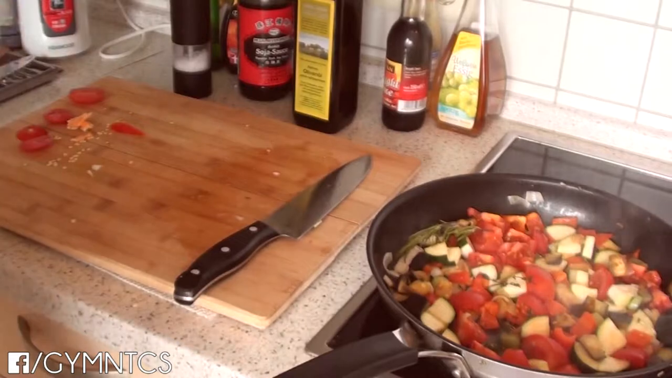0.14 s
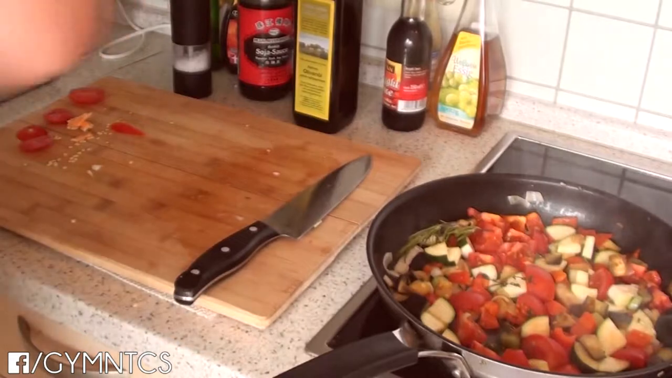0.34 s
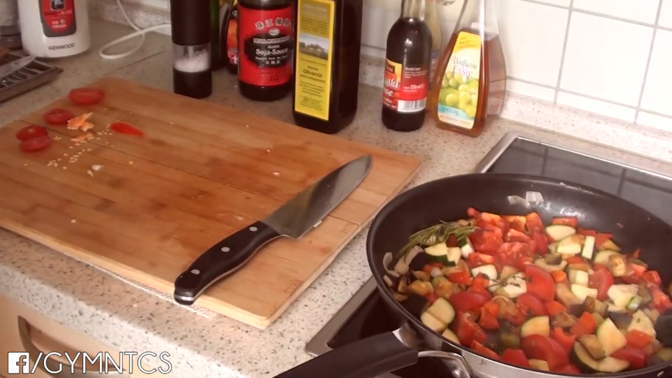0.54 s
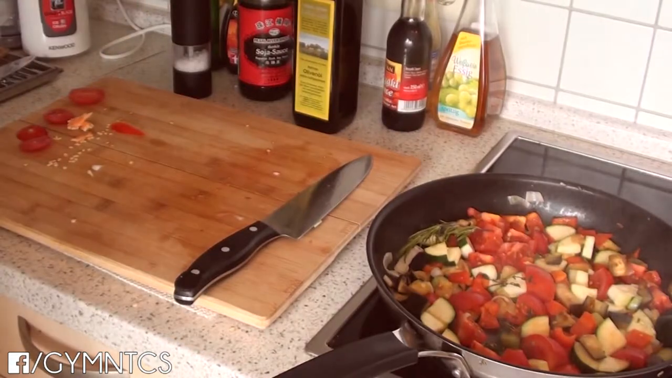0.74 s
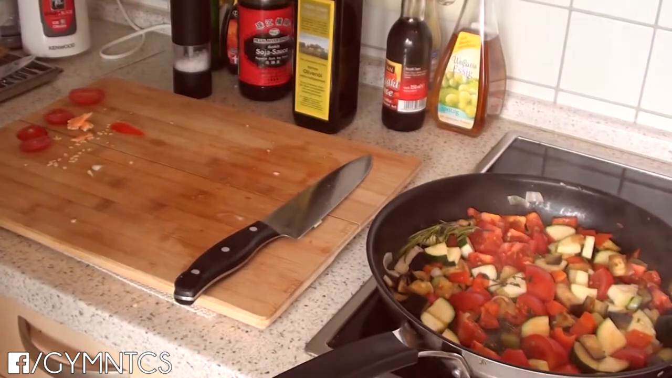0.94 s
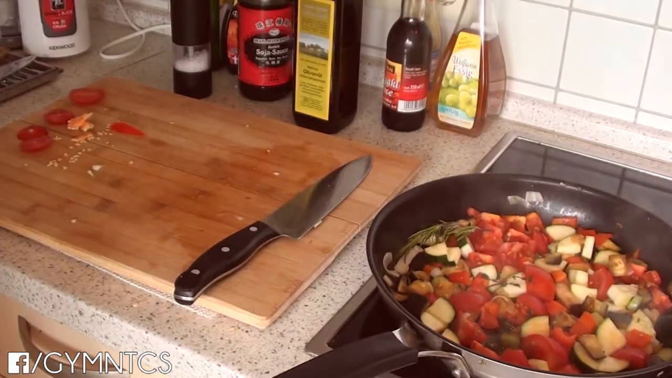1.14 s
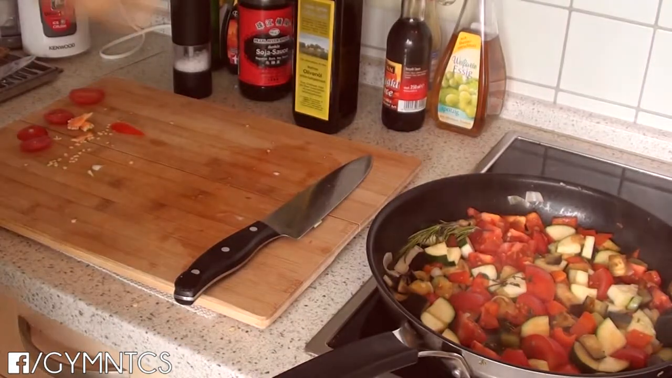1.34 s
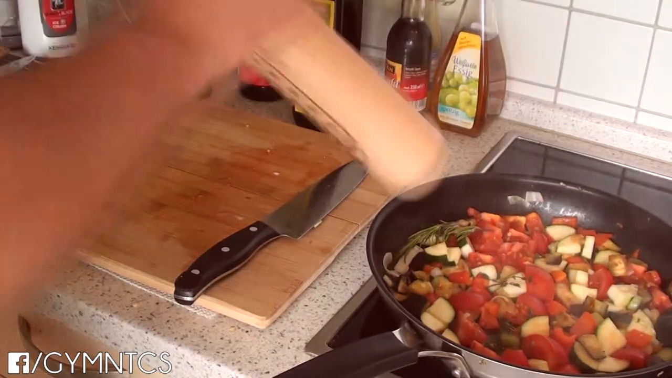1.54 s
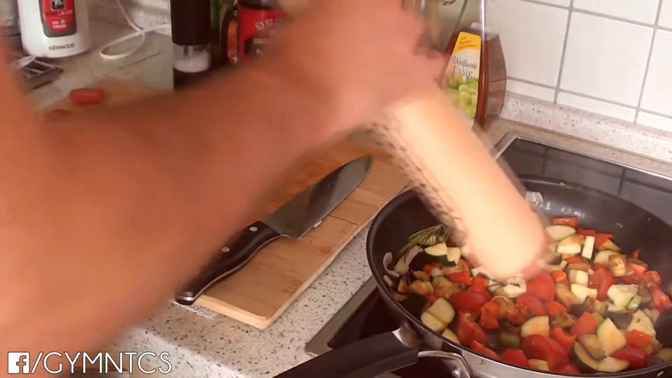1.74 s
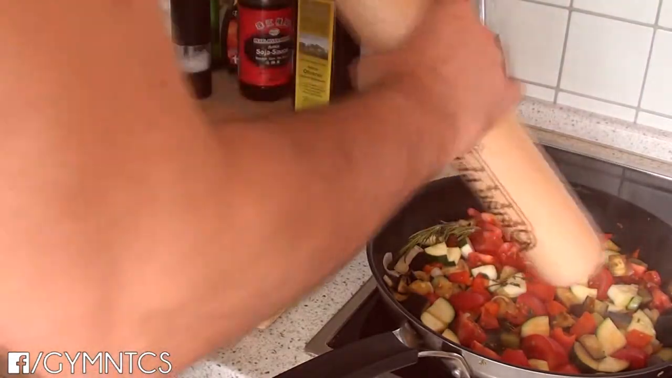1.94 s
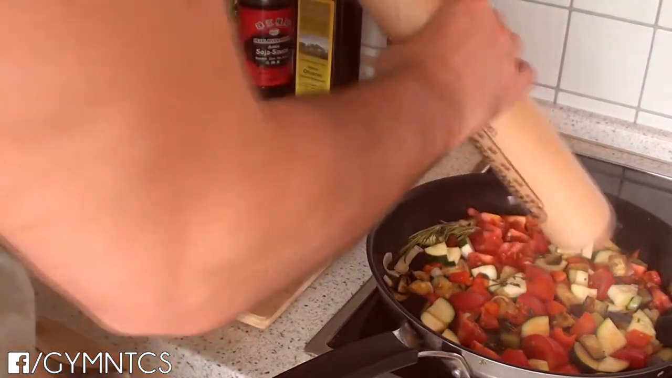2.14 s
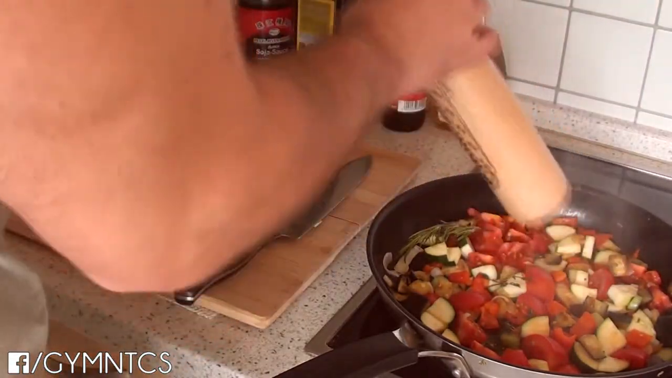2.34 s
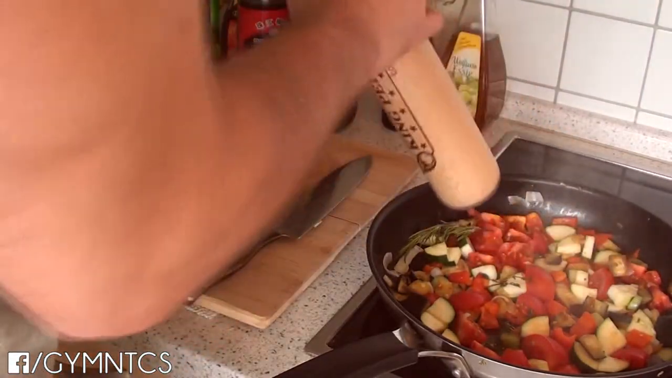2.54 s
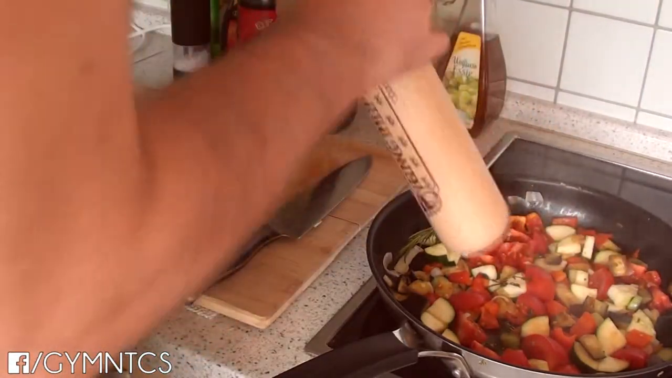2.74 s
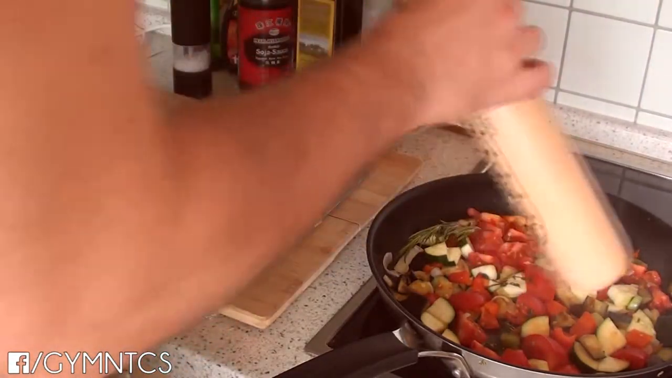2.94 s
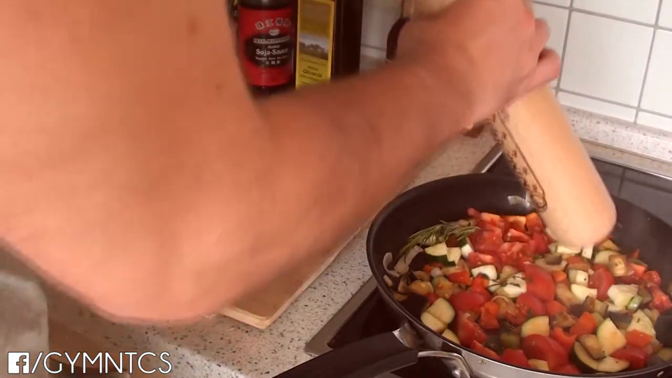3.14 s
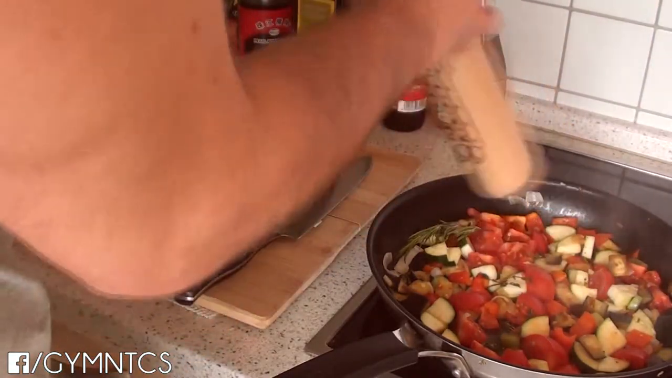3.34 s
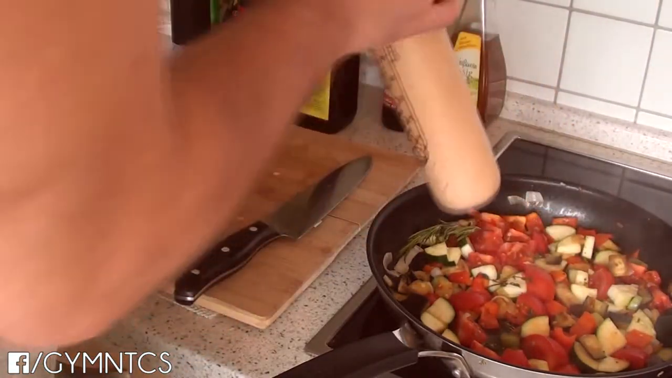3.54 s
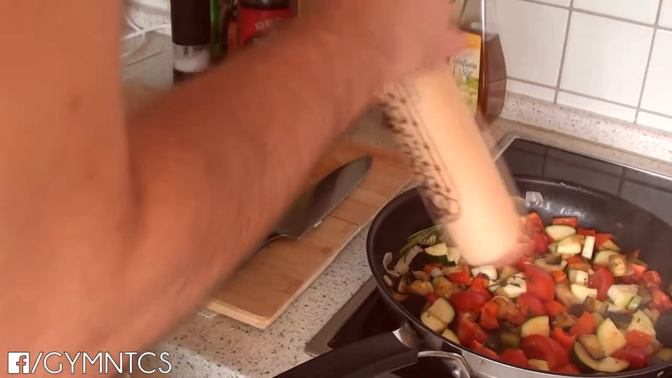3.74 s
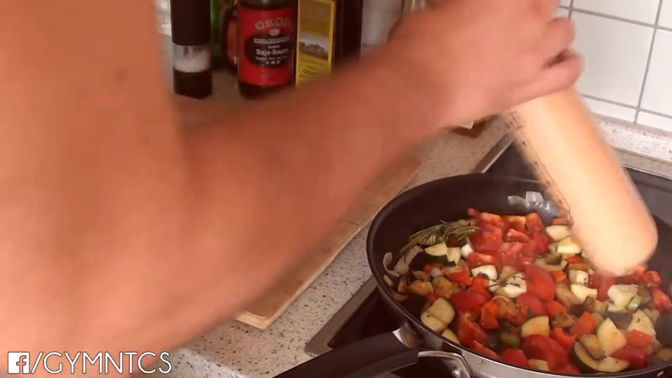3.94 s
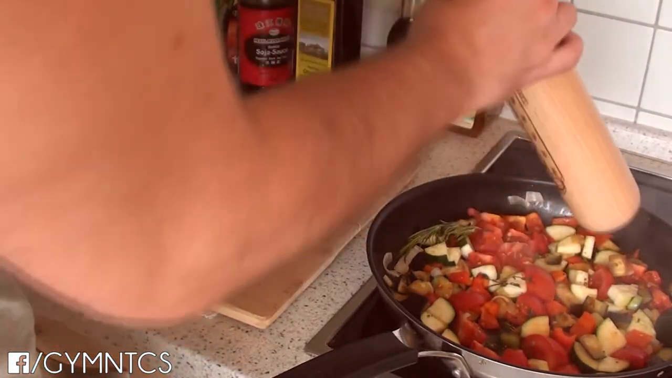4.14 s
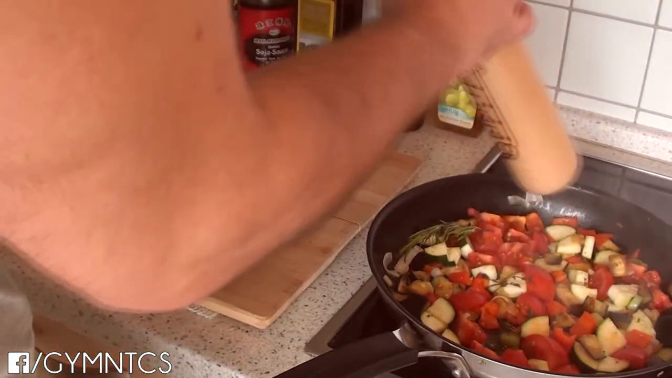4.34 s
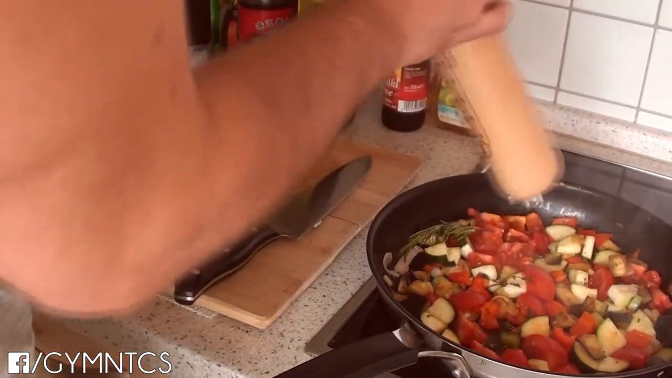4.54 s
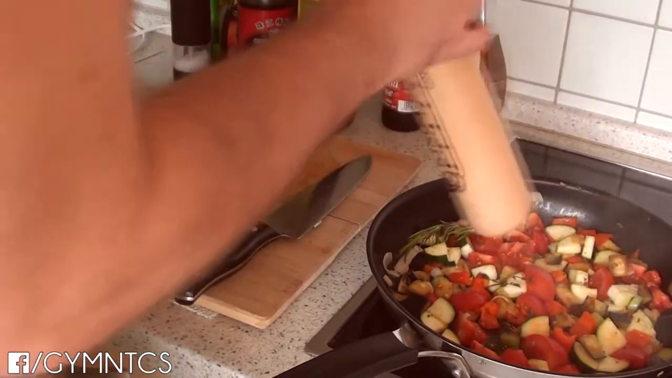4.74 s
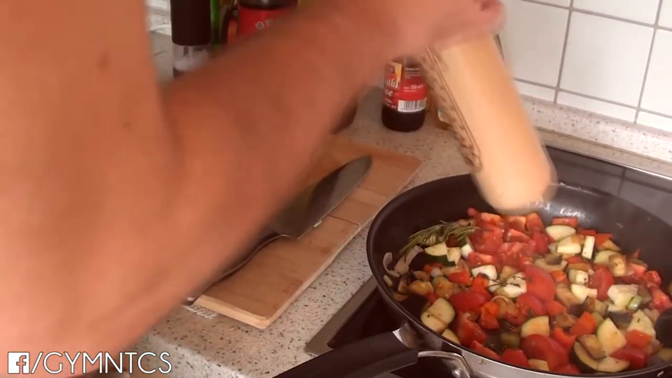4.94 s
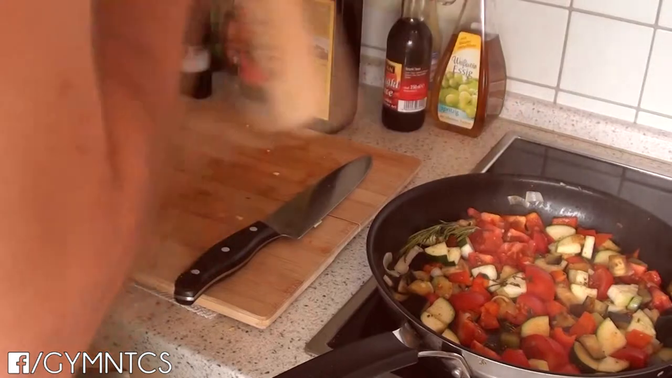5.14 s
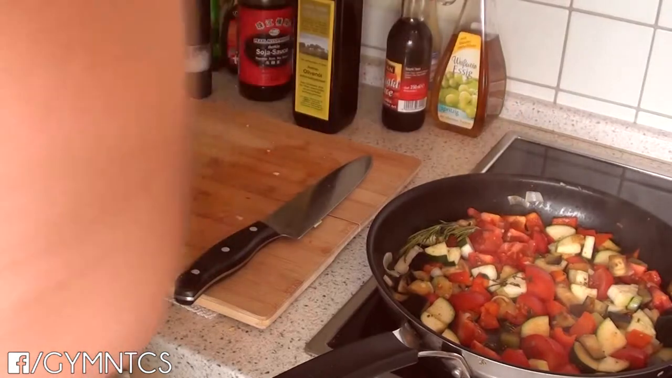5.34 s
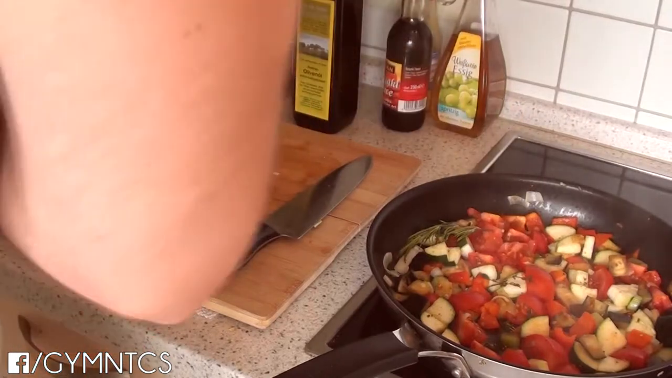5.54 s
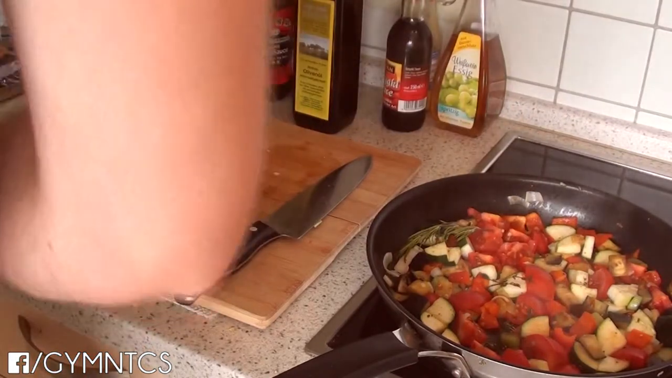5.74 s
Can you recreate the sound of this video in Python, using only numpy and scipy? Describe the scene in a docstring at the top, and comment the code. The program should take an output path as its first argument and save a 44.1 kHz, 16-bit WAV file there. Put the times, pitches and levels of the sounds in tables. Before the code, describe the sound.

Vegetables sizzle softly in a pan; a dull wooden knock, then a pepper mill crunches in quick, crackling twists in a tiled kitchen.

```python
"""Light rustles and a dull wooden knock come first, over the soft sizzle of vegetables in a pan.
Then a wooden pepper mill is twisted in quick strokes. Each twist is a dense crunch of random grains
with a few sharp cracks, which ring the wooden body and the steel burr as fading tones.
Random clicks make the sizzle and a fine ticking, likely falling pepper, that rises as the mill is lifted.
A fading noise tail is the echo of the tiled kitchen, and a fast compressor holds the loudest peaks."""
import sys
import numpy as np
from scipy import signal
from scipy.fft import rfft, irfft
from scipy.io import wavfile
from scipy.ndimage import uniform_filter1d, minimum_filter1d

SR = 44100
rng = np.random.default_rng(int(sys.argv[2]) if len(sys.argv) > 2 else 0)


def unload_audio(sound):
    """Save the sound as a 16-bit wav file, at the path given as the first command line argument."""
    columns = np.transpose(np.atleast_2d(sound))
    # keep every value between -1 and 1, then stretch to whole-number steps
    steps = np.round(np.clip(columns, -1, 1) * 32767)
    wavfile.write(sys.argv[1], SR, steps.astype(np.int16))


N = 254837
T = np.arange(N) / SR  # time in seconds

# All levels in the tables are relative: they are mixed further on.
# Twists of the mill, about three a second.
# Each row: start in seconds, length in seconds, force on the wooden body in dB, bright grit in dB.
TWISTS = [(1.602, 0.066, -21, -24.5), (1.904, .048, -14, -18), (2.028, 0.063, -40, -23.5),
          (2.174, 0.069, -21.5, -21.5), (2.482, 0.057, -22.5, -22.5), (2.772, 0.096, -24, -19.5),
          (3.074, 0.071, -20, -18), (3.385, 0.095, -28.5, -22.5), (3.705, .07, -19, -18.5),
          (4.025, 0.051, -23.5, -26.5), (4.328, 0.11, -18, -19), (4.633, .082, -17, -17),
          (4.935, 0.016, -26.5, -24)]
# Tones of the mill's wooden body.
# Each row: pitch in Hz before random detuning, level in dB, time to fade by 60 dB in seconds.
BODY = [(905, 3, 0.11), (1285, -40.5, 0.18), (1436, -41, 0.016), (1578, 4.5, 0.2), (1695, 9.5, 0.011),
        (1792, 13, 0.042), (2477, -18.5, 0.034)]
# Tones of the steel burr and shaft, with the same columns; only the cracks detune them.
BURR = [(2850, -8.5, 0.11), (3210, -12, 0.035), (3085, 4, 0.046), (4420, -4.5, 0.12)]


def undb(db):
    """Turn decibels into a gain."""
    return 10 ** (np.asarray(db) / 20)


def unit(x):
    """Scale to an energy of one."""
    return x / np.sqrt(np.sum(x ** 2) + 1e-18)


def add(track, s, sound):
    """Mix a sound into a track at time s in seconds."""
    i = max(int(s * SR), 0)
    track[i:i + len(sound)] += sound[:max(N - i, 0)]


def through(x, response):
    """Pass a sound through an impulse response."""
    return signal.fftconvolve(x, response)[:N]


def high_pass(x, hz, order):
    """Weaken what lies below hz."""
    return signal.sosfilt(signal.butter(order, hz, "high", fs=SR, output="sos"), x)


def on_log_axis(hz, points_hz, values):
    """Join points by straight lines over log frequency."""
    return np.interp(np.log(hz + 1), np.log(points_hz), values)


def colour(points, size=4096):
    """Make a filter of unit energy that follows an outline of (Hz, dB) and never sounds early."""
    db = on_log_axis(np.fft.rfftfreq(size, 1 / SR), *np.transpose(points))
    # folding the cepstrum gives the outline its minimum-phase response
    cepstrum = irfft(np.log(undb(db)))[:size // 2]
    cepstrum[1:] *= 2
    return unit(irfft(np.exp(rfft(cepstrum, size)))[:size // 2])


def resonance(hz, width):
    """Make a unit-energy response with one broad peak; width is a share of its centre."""
    b, a = signal.iirpeak(min(hz, SR / 3), 1 / width, fs=SR)
    impulse = T[:SR // 20] == 0
    return unit(signal.lfilter(b, a, impulse))


def ring(modes):
    """Sum the fading tones of a struck object into a response of unit energy."""
    t = T[:SR // 4]
    total = 0
    for k, (hz, db, t60) in enumerate(modes):
        tone = np.sin(2 * np.pi * hz * t) * np.exp(-np.log(1000) * t / t60)
        total = total + undb(db) * unit(tone) * (-1) ** k  # every other tone is flipped
    return unit(total)


def detuned(modes, share):
    """Nudge each tone in pitch, as the grip and the point of contact do."""
    return [(hz * (1 + share * rng.standard_normal()), db, t60) for hz, db, t60 in modes]


def grains(count, per_s, spread_db):
    """Scatter random clicks of very uneven size over count samples, with an rms of one."""
    chance = rng.random((count, 2))
    size = undb(spread_db * np.minimum(rng.exponential(size=count), 4))
    happens = chance[:, 0] < per_s / SR
    sign = np.sign(chance[:, 1] - .5)
    return unit(happens * sign * size) * np.sqrt(count)


def burst(decay_s, size=4096, count=6):
    """Make a brief rattle of contacts, of unit energy and fairly even in spectrum, that dies away."""
    fade = np.exp(-T[:size] / max(decay_s, 1 / SR))
    x = rng.standard_normal(size) * fade
    for _ in range(count):
        flat = irfft(np.exp(1j * np.angle(rfft(x))))
        x = flat * np.sqrt(fade)
    return unit(x)


def walk(per_s):
    """Wander slowly and randomly with a spread near one."""
    k = int(SR / per_s)
    steps = np.repeat(rng.standard_normal(N // k + 1), k)
    return uniform_filter1d(steps, k)[:N]


def room_tone():
    """Faint coloured noise is the air of the room, and a steady sine is the mains hum."""
    # Each row: frequency in Hz, level in dB.
    air = [(40, -19.5), (100, -23), (200, -14), (450, 1), (750, 1.5), (1300, -1.5), (1900, 1), (3000, -6),
           (6000, -23)]
    hum = undb(-74.5) * np.sqrt(2) * np.sin(2 * np.pi * 50 * T)
    return undb(-59.5) * through(rng.standard_normal(N), colour(air)) + hum


def kitchen(x, gap_s=0.001, build_s=0.0079):
    """Reflections off tiles and cupboards build up quickly and fade at a rate set for each band."""
    # Each row: band centre in Hz, time to fade by 60 dB in seconds, level in dB.
    echo_bands = [(150, 0.61, -6), (398, 0.31, 2), (900, 0.58, -4), (1660, 0.45, -2.5), (3500, 0.42, 1.5),
                  (7300, 0.54, -8), (14500, 0.35, -4)]
    size = 32768
    t = np.maximum(T[:size] - gap_s, 0)
    hz = np.fft.rfftfreq(size, 1 / SR)
    noise = rfft(rng.standard_normal(size))
    centres = [row[0] for row in echo_bands]
    tail = 0
    # each share picks one band, blending into its neighbours
    for share, (_, t60, db) in zip(np.eye(len(echo_bands)), echo_bands):
        fade = unit((1 - np.exp(-t / build_s)) * np.exp(-np.log(1000) * t / t60))
        tail = tail + undb(db) * fade * irfft(noise * on_log_axis(hz, centres, share))
    return through(x, tail)


def pan_and_ticking(flicker_db=-2.76):
    """Steam bubbles burst in the oil as a narrow hiss; fine clicks, likely falling pepper, tick above."""
    # Colour of the hiss. Each row: frequency in Hz, level in dB.
    hiss_colour = [(2500, -29), (4000, -23), (5200, -20), (5900, -9), (6500, 0), (7150, 4.5), (8400, -1),
                   (9500, -9), (11000, -13.5), (12500, -20), (14000, -26), (16000, -33.5)]
    # Colour of the ticking. Each row: frequency in Hz, level in dB.
    ticking_colour = [(400, -32.5), (3000, -31.5), (5500, -8.5), (7000, 6), (9000, -3.5), (12000, -6.5),
                      (16000, -20)]
    # Level of the fine ticking, likely pepper falling, that rises as the mill is lifted.
    # Each row: time in seconds, level in dB.
    ticking_levels = [(0, -60.5), (1.15, -62.5), (1.48, -35.5), (2.4, -42.5), (4.3, -44.5), (5.2, -46),
                      (5.55, -65)]
    # The loudest single ticks: pepper shifting as the mill is lifted, and spitting fat.
    # Each row: time in seconds, level in dB.
    loud_ticks = [(1.3733, -9.5), (1.474, 2), (3.2208, 0.5), (3.2554, -4), (5.1931, -8)]
    bubbles = grains(N, 7000, spread_db=3) * undb(-37 + flicker_db * walk(per_s=20))
    lone_ticks = grains(N, 70, spread_db=3.5) * undb(-47)
    sparse = grains(N, 8, spread_db=3.5) * undb(-7)
    dense = grains(N, 900, spread_db=4.5)
    ticking = (dense + sparse) * undb(np.interp(T, *np.transpose(ticking_levels)))
    for s, db in loud_ticks:
        add(ticking, s, undb(db) * burst(decay_s=0.00067))
    hiss = through(bubbles + lone_ticks, colour(hiss_colour))
    return hiss + through(ticking + undb(-32.5) * lone_ticks, colour(ticking_colour))


def rubs_and_flare():
    """Grainy clicks in bands of pitch: soft rubs of things moved, and one brief flare of the sizzle."""
    # Light rustles and scrapes; the row at 7300 Hz is the flare. Each row: start in seconds,
    # length in seconds, level in dB, centre in Hz, width as a share of the centre.
    soft_sounds = [(0.283, 0.054, -42, 5600, 0.16), (0.279, .045, -54, 2930, .06),
                   (0.36, 0.057, -41.5, 420, 0.62), (0.431, .14, -52, 430, 0.89),
                   (0.573, .05, -42.5, 500, 0.49), (.574, 0.022, -29, 7300, 0.093),
                   (.57, 0.046, -48.5, 1940, 0.075), (1.373, 0.1, -49.5, 4650, 0.46),
                   (1.375, 0.026, -55, 651, 0.69)]
    out, t = np.zeros(N), T[:SR // 2]
    for s, length, db, hz, width in soft_sounds:
        swell = (1 - np.exp(-t / 0.0048)) * np.exp(-np.maximum(t - length, 0) / .033)
        band = unit(through(resonance(hz, width), resonance(hz, 2 * width)))
        clicks = grains(len(t), 6000, spread_db=2.5) * swell
        add(out, s, undb(db) * through(clicks, band))
    return out


def knocks():
    """Blunt blows on the worktop give a thud and make its low tones ring."""
    # Something wooden is set down and rocks before it settles.
    # Each row: time in seconds, level in dB, contact length in seconds.
    blow_list = [(0.6379, -1.5, 0.031), (0.645, 1.5, 0.015), (0.662, -4.5, 0.012), (0.681, -1.5, 0.018)]
    # Colour of the thud. Each row: frequency in Hz, level in dB.
    thud_colour = [(40, -34), (100, -26.5), (165, -20), (220, 1.5), (300, -15), (430, 3.5), (530, -5.5),
                   (700, -2), (930, -17), (1130, -10), (1450, -21.5), (1900, -18), (3200, -31),
                   (4500, -36.5), (8000, -69)]
    # Tones of the worktop. Each row: pitch in Hz, level in dB, time to fade by 60 dB in seconds.
    worktop = [(217, -8, .16), (261, -15.5, 0.32), (419, 5.5, 0.12), (425, -1, 0.3), (533, -5.5, 0.19),
               (577, -6, 0.086), (640, -17.5, 0.07), (650, -14, 0.21), (735, -18, .12), (1090, -19.5, 0.16),
               (1135, -24, .2), (1826, -12.5, 0.22)]
    blows = np.zeros(N)
    for s, db, contact_s in blow_list:
        add(blows, s, undb(db) * burst(contact_s))
    thud = undb(19) * through(blows, colour(thud_colour))
    ringing = undb(12.5) * through(blows, ring(worktop))
    return high_pass(thud + ringing, hz=90, order=2)


def damping(spread_db):
    """Hand and contact point damp the mill differently each time: random peaks and dips."""
    return colour([(hz, spread_db * rng.standard_normal()) for hz in np.geomspace(700, 9000, num=22)])


def chips(count=2):
    """A tick starts each twist as the burr catches, then small corns split at random moments."""
    catch_body_db, catch_snap_db = 14, 16.5  # the tick, above the twist's force and grit
    chip_body_db, chip_snap_db, scatter_db = 18.5, 16, 3  # small cracks, above force and grit
    rows = []  # each row: time in seconds, blow in dB, snap in dB
    for s, length, force_db, grit_db in TWISTS:
        rows.append((s, force_db + catch_body_db, grit_db + catch_snap_db))
        for moment in rng.uniform(.25, 1, count):
            blow_db, snap_db = scatter_db * rng.standard_normal(2)
            rows.append((s + length * moment, force_db + chip_body_db + blow_db,
                         grit_db + chip_snap_db + snap_db))
    return rows


def crushing(wood_detune, grains_per_s=2600, spread_db=2.0, catch_db=3.0):
    """The burr crushes corns in jerks: grains push the body, ring wood and steel, and add grit."""
    rise_s, swell_s, release_s = 0.0037, 0.012, 0.042
    grumble_db, grumble_follow = -18.5, 0.41  # level at a force of 0 dB; dB gained per dB of force
    body, rings, grit, low = np.zeros((4, N))
    # corns catch and give way, so the force flutters within a twist
    force = undb(catch_db * walk(per_s=170))
    t = T[:SR // 4]
    for s, length, force_db, grit_db in TWISTS:
        i = int(s * SR)
        turn = (1 - np.exp(-t / rise_s)) * np.exp(-np.maximum(t - length, 0) / release_s)
        effort, loudness = turn * force[i:i + len(t)], np.sqrt(np.sum(turn ** 2))
        coarse = unit(grains(len(t), grains_per_s, spread_db) * effort) * loudness
        fine = unit(grains(len(t), grains_per_s, spread_db) * effort) * loudness
        grip = damping(spread_db=3)
        push = undb(force_db) * through(coarse, grip)
        add(body, s, push)
        add(rings, s, through(push, ring(detuned(BODY, wood_detune)) + undb(-22) * ring(BURR)))
        add(grit, s, undb(grit_db) * through((coarse + fine) / np.sqrt(2), grip))
        # the low grumble swells as the burr bites deeper
        swell = 1 - np.exp(-(t / swell_s) ** 2)
        add(low, s, undb(grumble_db + grumble_follow * force_db) * coarse * swell)
    return body, rings, grit, low


def cracking(wood_detune, steel_detune=.01, crack_s=.0032, snap_s=.0048, snap_width=0.43):
    """Corns burst: short rattles strike the body, ring wood and steel, and snap sharply."""
    # The biggest corns. Each row: time in seconds, blow to the body in dB, sharp snap in dB.
    big_cracks = [(1.622, 8, 17.5), (1.908, 13, 8.5), (1.985, 1, 9), (2.176, 8, 10), (2.231, 13.5, -1),
                  (2.4841, 12, 11), (2.783, 14, 12.5), (2.856, 12.5, 14), (3.086, -1, 14.5),
                  (3.399, 8, 16.5), (3.4159, 15.5, 15), (3.769, 2, -4), (4.041, 7, 11.5), (4.336, 13, 2),
                  (4.379, 21, 21.5), (4.428, 17.5, 16.5), (4.6588, 16.5, 5), (4.695, 16, 19.5)]
    steel_offset_db, steel_follow = -2.5, 1.1  # ring at a blow of 0 dB; dB gained per dB of blow
    body, rings, grit = np.zeros((3, N))
    for s, body_db, snap_db in big_cracks + chips():
        # the steel gains more than the wood from a hard blow; every corn snaps at its own pitch
        steel_db = steel_offset_db + steel_follow * body_db
        snap_hz = 6180 * np.exp(0.17 * rng.standard_normal())
        contact = damping(spread_db=4.5)
        crack = through(burst(crack_s), contact)
        wood = undb(body_db) * ring(detuned(BODY, wood_detune))
        steel = undb(steel_db) * ring(detuned(BURR, steel_detune))
        add(body, s, undb(body_db) * crack)
        add(rings, s, through(crack, wood + steel))
        snap = unit(through(resonance(snap_hz, snap_width), contact))
        add(grit, s, undb(snap_db) * through(burst(snap_s), snap))
    return body, rings, grit


def mill(wood_detune=.025):
    """Crunch and cracks sound together through the colours of wood, grit and a low grumble."""
    # Three colours. Each row: frequency in Hz, level in dB.
    wood_colour = [(200, -48), (400, -13), (600, -9.5), (800, 5.5), (1050, -0.5), (1600, 10), (2150, 1.5),
                   (2600, 3.5), (3200, 4), (3800, -3), (5500, -41.5), (12000, -60.5)]
    grit_colour = [(500, -68), (2500, -37), (3800, -3.5), (4600, -0.5), (5200, -1), (5900, 3.5), (7200, 1),
                   (8400, -4.5), (9600, -11.5), (10900, -10.5), (12500, -19.5), (16000, -32)]
    grumble_colour = [(90, -26), (140, -22), (185, -6), (330, 0.5), (500, 11), (800, 12.5), (1200, 10),
                      (2200, -20.5), (8000, -127)]
    *crush, low = crushing(wood_detune)
    body, rings, grit = np.array(crush) + np.array(cracking(wood_detune))
    crunch = undb(-2.5) * through(body, colour(wood_colour)) + undb(-6.5) * rings
    crunch = crunch + undb(-2.5) * through(grit, colour(grit_colour))
    grumble = undb(-4.5) * through(low, colour(grumble_colour))
    # the slim body radiates almost no bass
    return high_pass(crunch, hz=590, order=3) + high_pass(grumble, hz=153, order=6)


def scene():
    """Mill, worktop and pan share one small hard room."""
    near, knocking, frying = mill() + rubs_and_flare(), knocks(), pan_and_ticking()
    echo = kitchen(undb(-3.5) * near + undb(-2.5) * knocking + undb(-2.0) * frying)
    return (near + knocking + frying + echo + room_tone())[None]


def record(dry, threshold_db=-13, ratio=1.4):
    """A fast look-ahead compressor leans on loud moments and limits peaks; the top is cut."""
    k, ceiling = int(.003 * SR), .82  # window in samples; highest level before the top is cut
    envelope = np.sqrt(np.maximum(uniform_filter1d(dry ** 2, k), 1e-12))
    gain = np.minimum(1, undb(threshold_db) / envelope) ** (1 - 1 / max(ratio, 1))
    gain = np.minimum(gain, ceiling / (np.abs(dry) + 1e-9))
    # the lowest gain nearby is held, then smoothed, so it drops ahead of a peak
    held = dry * uniform_filter1d(minimum_filter1d(gain, k), k)
    return signal.sosfilt(signal.ellip(10, .2, 70, 16000, fs=SR, output="sos"), held)


dry = scene()
out = record(dry)
unload_audio(out)
```